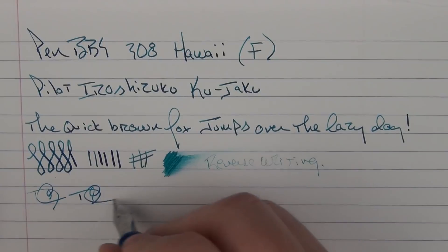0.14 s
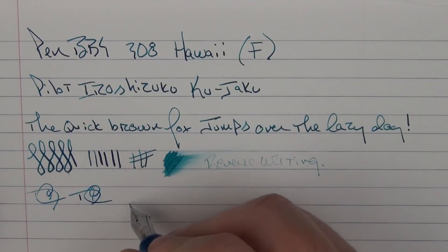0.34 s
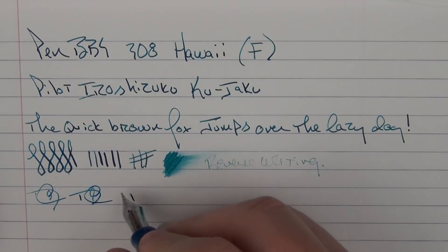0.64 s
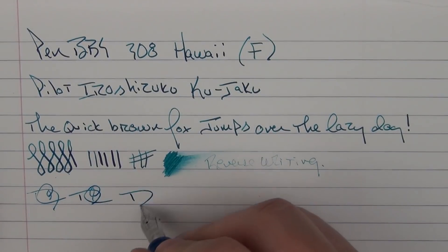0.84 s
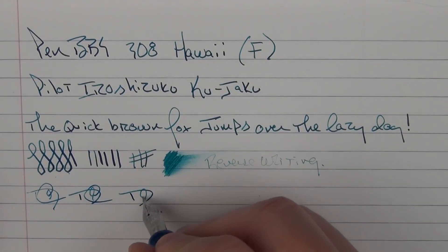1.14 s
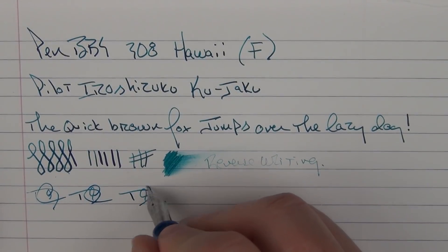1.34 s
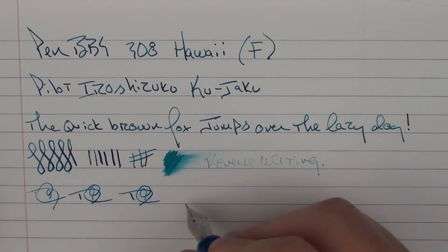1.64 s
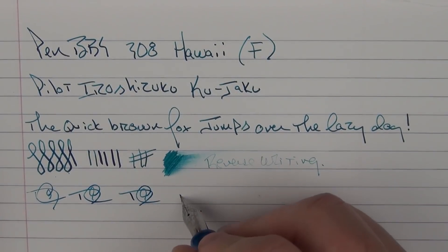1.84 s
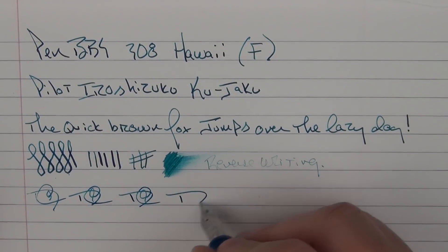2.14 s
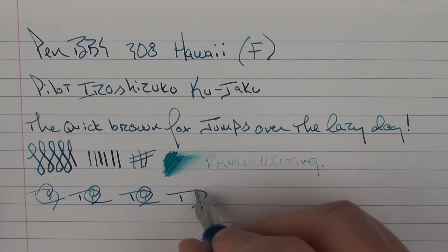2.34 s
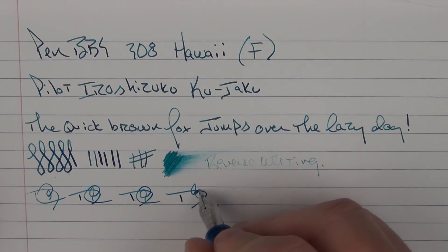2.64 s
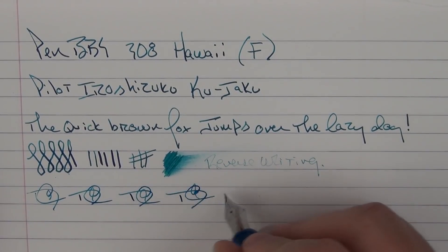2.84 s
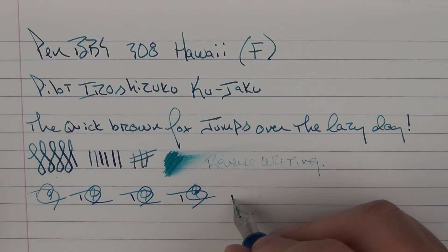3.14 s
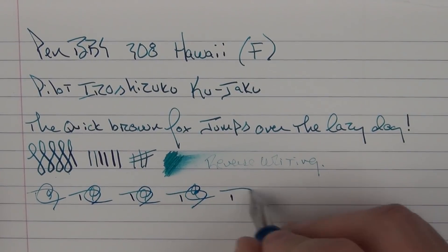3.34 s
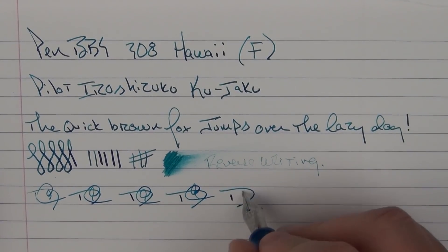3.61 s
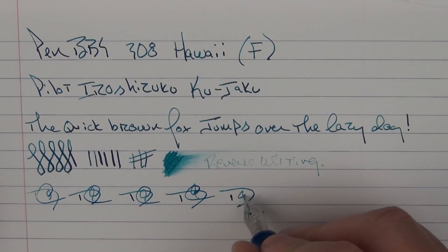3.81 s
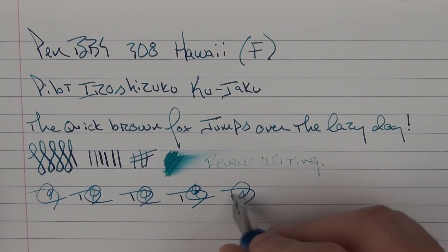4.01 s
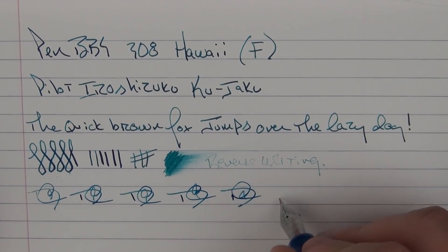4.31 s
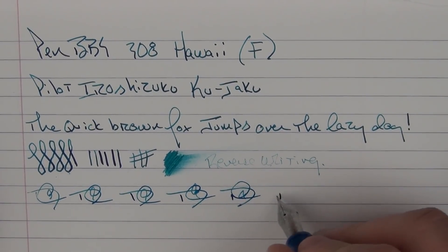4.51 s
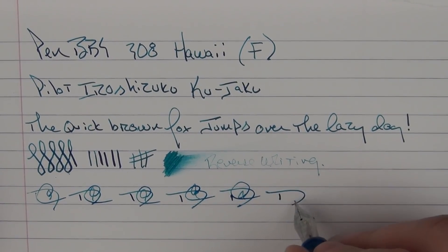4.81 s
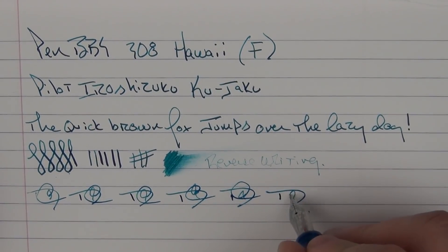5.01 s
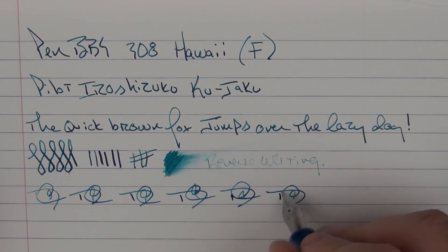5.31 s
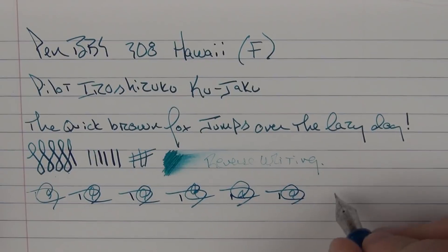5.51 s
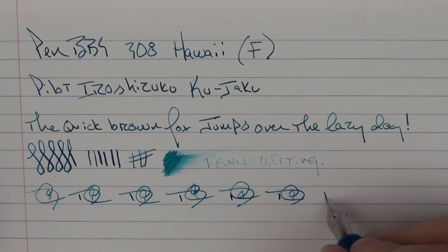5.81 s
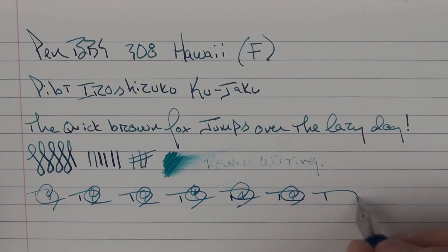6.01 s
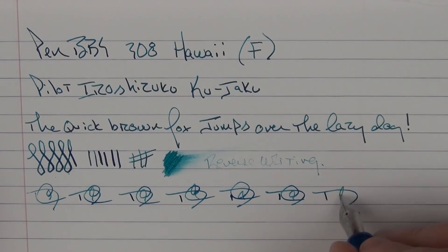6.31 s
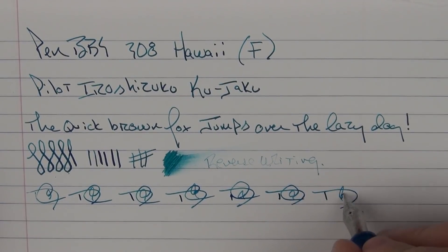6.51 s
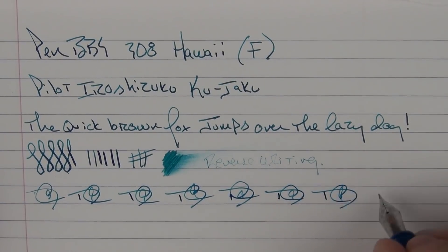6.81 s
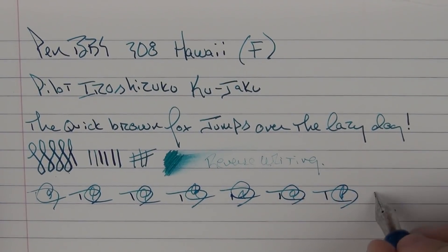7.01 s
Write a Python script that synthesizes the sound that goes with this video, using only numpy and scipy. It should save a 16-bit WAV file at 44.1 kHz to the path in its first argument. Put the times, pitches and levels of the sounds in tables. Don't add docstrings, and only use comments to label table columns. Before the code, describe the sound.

Close, scratchy pen strokes in rapid bursts, bright ticks and woody taps, brief skin hisses between, a late double knock, over low motor hum.

```python
import sys
import numpy as np
from scipy import signal
from scipy.fft import rfft, irfft
from scipy.io import wavfile
from scipy.ndimage import uniform_filter1d

SR = 44100
rng = np.random.default_rng(int(sys.argv[2]) if len(sys.argv) > 2 else 0)


def boost_factor(decibels):
    exponent = np.asarray(decibels, float) / 20
    return 10 ** exponent


def wav_record(signal):
    frames = np.transpose(np.atleast_2d(signal))
    bounded = np.clip(frames, -1, 1)
    quanta = np.round(bounded * 32767).astype(np.int16)
    wavfile.write(sys.argv[1], SR, quanta)


N = 315315

# f/Hz, width/Hz, level/dB
BARREL = [(598, 56, 2), (719, 11, -8), (740, 180, -13), (1007, 61, 4), (1022, 45, 1.5), (1176, 194, 2),
          (1341, 130, 3.5), (1495, 41, 7.5), (1688, 94, 1.5), (1986, 90, -1), (2486, 220, -7),
          (2874, 290, -14.5)]
# f/Hz, width/Hz, level/dB
TIP = [(3530, 440, -6), (4600, 250, -8.5), (5190, 107, -6.5), (5840, 350, -6), (6510, 350, -10),
       (6920, 136, -3), (7550, 290, -5), (8340, 310, -6), (9560, 370, -13), (10560, 350, -13.5),
       (11530, 170, -9), (12600, 260, -12), (14600, 700, -27)]


def curve(rows):
    return np.interp(np.arange(N) / SR, *np.transpose(rows))


def coloured(points):
    extra = 45
    hz = np.maximum(np.fft.rfftfreq(N + extra, 1 / SR), 1)
    at, db = np.transpose(points)
    shape = boost_factor(np.interp(np.log(hz), np.log(at), db))
    x = irfft(rfft(rng.standard_normal(N + extra)) * shape)[:N]
    return x / x.std()


def dull(x, hz):
    return signal.sosfilt(signal.butter(4, hz, fs=SR, output="sos"), x)


def body(x, modes, patchy_db=0.):
    gap = np.zeros(SR // 4)
    probe = np.concatenate([x + 1e-18, gap, [1.], gap])
    grip = uniform_filter1d(rng.standard_normal((len(modes), 400)), size=2) * np.sqrt(2)
    grip_at = np.linspace(0, len(x), 400)
    out = 0
    for k, (hz, width, db) in enumerate(modes):
        r = np.exp(-np.pi * abs(width) / SR)
        swell = np.interp(np.arange(len(probe)), grip_at, grip[k], right=0)
        poles = [1, -2 * r * np.cos(2 * np.pi * hz / SR), r * r]
        ring = signal.lfilter([1, 0, -1], poles, probe * boost_factor(patchy_db * swell))
        out = out + (-1) ** k * boost_factor(db) * (1 - r * r) * ring
    return out[:len(x)] / np.linalg.norm(out[-SR // 4:])


def struck(modes, contact_s):
    t = np.arange(SR // 3) / SR
    ring = sum(share * np.sin(2 * np.pi * hz * t) * boost_factor(-60 * t / t60) for hz, share, t60 in modes)
    force = np.hanning(max(int(contact_s * SR), 3))
    return np.convolve(ring, force / force.sum())[:len(t)]


def pulses(rows, shape):
    s, db = np.transpose(rows)
    train = np.zeros(N)
    np.add.at(train, (s * SR).astype(int), boost_factor(db))
    return signal.fftconvolve(train, shape)[:N]


def fibres(per_s, spread_db):
    size = boost_factor(spread_db * np.minimum(rng.exponential(1, N), 5)) * rng.choice([-1, 1], N)
    x = size * (rng.random(N) < per_s / SR)
    return x / x.std()


def hum():
    # f/Hz, level/dB
    orders = [(29.9, -28), (59.8, -34), (89.8, -17), (120, -5.5)]
    wander = np.cumsum(coloured([(1, 31), (3, -23), (30, -59)])) / SR
    turn = 2 * np.pi * (np.arange(N) / SR + 0.0018 * wander)
    return sum(np.sqrt(2) * boost_factor(db) * np.sin(hz * turn + k) for k, (hz, db) in enumerate(orders))


def room_air():
    # f/Hz, level/dB per Hz
    air = [(35, -0.5), (52, -5), (75, -13), (100, -3.5), (170, -11.5), (345, -16), (510, -23.5),
           (1150, -29), (4370, -35), (7230, -36), (16000, -37.5)]
    return coloured(air)


def capsule_hiss():
    # f/Hz, level/dB per Hz
    capsule = [(40, -1.5), (150, -5.5), (345, -3.5), (1470, -9.5), (6000, -9), (16000, -9.5)]
    return coloured(capsule)


def desk_rumble(gain):
    # t/s, level/dB
    leans = [(.9, -34), (1.59, -23), (1.9, -25), (2.07, -20.5), (2.38, -28), (3.15, -29), (3.37, -21),
             (3.68, -26), (4.02, -27), (4.19, -22), (4.49, -27), (4.68, -23), (5.0, -22), (5.42, -21),
             (5.59, -20.5), (5.81, -21), (6.05, -20), (6.2, -27), (6.77, -29), (6.92, -22)]
    lean_s, steady_db = 0.11, -23.5
    s, db = np.transpose(leans)
    t = np.arange(0, N, 50) / SR
    power = (boost_factor(db - 10 * ((t[:, None] - s) / lean_s) ** 2) ** 2).sum(axis=1)
    level = np.sqrt(np.interp(np.arange(N) / SR, t, power) + (gain * boost_factor(steady_db)) ** 2)
    return level * coloured([(5, -24), (15, 23), (22, 0), (40, 16.0), (55, -1), (90, -34.5)])


def nib(tail=1.71):
    # t of top speed/s, barrel level/dB, length/s, tip level over barrel/dB
    pulls = [(0.037, -41.5, .04, -27), (.132, -31, 0.047, -13.5), (.19, -26.5, 0.033, -10.5),
             (.902, -28.5, 0.053, -14.5), (1.378, -29.5, 0.018, -17), (2.236, -25, 0.048, -12),
             (2.428, -38, 0.065, -5.5), (2.725, -30, .029, -17), (2.931, -38.5, 0.055, -1.5),
             (3.503, -28.5, 0.041, -11.5), (3.691, -40.5, .041, -8), (3.761, -37, 0.031, -10),
             (4.19, -35.5, 0.053, -7), (4.526, -33.5, .031, -10.5), (5.302, -33.5, 0.033, -14),
             (6.069, -33.5, 0.051, -1.5), (6.14, -25.5, 0.027, -17)]
    flicks = [(1.076, -42.5, 0.045, -8), (1.172, -41.5, 0.044, -7.5), (1.232, -42, 0.036, -10.5),
              (5.531, -31, .018, -16), (1.532, -25, 0.047, -10), (1.848, -46, 0.034, -1),
              (1.93, -37, 0.035, -8), (2.129, -15, 0.042, -11), (2.359, -38, 0.024, -5),
              (2.493, -35, .037, -7), (3.116, -43.5, 0.046, -2), (3.386, -21.5, 0.021, -9.5),
              (3.63, -39.5, 0.029, -8), (3.98, -33, 0.037, -13), (4.071, -28.5, 0.088, -9.5),
              (4.126, -18, 0.032, -14.5), (4.713, -17.5, 0.031, -12), (5.531, -38, 0.14, -11),
              (5.822, -42, 0.05, -4.5), (6.02, -17.5, 0.027, -27), (6.034, -19, 0.044, -12.5),
              (6.387, -34, .04, -9), (6.855, -33, 0.015, -13), (7.14, -36.5, 0.066, -10),
              (2.862, -19.5, 0.031, -12), (5.444, -21, 0.026, -12), (6.758, -23, 0.024, -13)]
    sweeps = [(.597, -41.5, 0.062, -7), (.819, -24, 0.051, -7.5), (1.475, -30.5, 0.1, -9.5),
              (2.554, -36, 0.024, -15), (2.79, -39, .03, -12), (2.824, -31, 0.085, -10),
              (3.209, -41, 0.093, -7.5), (3.411, -17, .035, -11.5), (3.472, -25.5, 0.042, -13.5),
              (3.818, -40.5, 0.039, -11), (4.432, -48, 0.028, -1), (4.657, -37, 0.016, -12),
              (4.749, -19, 0.034, -14), (4.813, -29.5, .06, -12), (5.008, -39, 0.022, -17),
              (5.088, -40, 0.045, -12), (5.394, -30.5, 0.086, -10.5), (6.115, -25, 0.028, -12.5),
              (6.313, -39, 0.065, -8.5), (6.605, -29, 0.025, -13), (6.685, -33, .033, -21),
              (6.716, -29, 0.098, -12.5), (7.045, -45, 0.015, -4)]
    # t/s, barrel level/dB
    light = [(.076, -51.5), (.155, -50), (.655, -56), (1.13, -52), (1.205, -54), (1.416, -48), (2.182, -42),
             (2.529, -49), (2.763, -47.5), (4.023, -49), (5.348, -45), (6.49, -59), (6.655, -52)]
    # f/Hz, width/Hz, level/dB
    slit_modes = [(3240, 130, 0), (3520, 160, -2)]
    # f/Hz, width/Hz, level/dB
    desk_modes = [(41.8, 7.3, -7), (106.2, 5, 9), (158.3, 6.1, 8), (184, 10.5, 3), (217, 23, -12.5),
                  (265.3, 12.5, -1.5), (343.3, 28.2, -0.5), (460, 60, -8.5), (677, 61, -12.5)]

    crossings = [(s, db, 0.033, 6) for s, db in light]
    kinds = (pulls, 0.62), (flicks, 0.37), (list(sweeps) + crossings, 0.51)
    t, power = np.arange(N) / SR, np.zeros((3, N))
    for rows, share in kinds:
        for s, db, length, tip_db in rows:
            rise, fall = share * length, (1 - share) * length
            desk_db = 11 + 0.52 * tip_db - 0.2 * (db + 31)
            near = slice(max(int((s - .15) * SR), 0), int((s + .2) * SR))
            late = t[near] - s
            off = np.abs(late) / np.maximum(np.where(late < 0, rise, fall), .004)
            parts_db = db + np.array([[0], [tip_db], [desk_db]])
            power[:, near] += boost_factor(parts_db - 6.68 * off ** tail) ** 2
    barrel, tip, desk = np.sqrt(power)

    catches = fibres(per_s=5000, spread_db=2.5)
    fine = fibres(per_s=6000, spread_db=3.0)
    slit_ring = body(np.sqrt(barrel * tip) * catches, slit_modes, patchy_db=2)
    paper = tip * np.diff(fine, n=2, prepend=[0, 0])
    desk_ring = body(desk * catches, desk_modes, patchy_db=2.0)
    upper_desk = dull(signal.lfilter([1, -.985], [1], desk_ring), hz=1330)
    barrel_ring = dull(body(barrel * catches, BARREL, patchy_db=3.0), hz=3330)
    tip_ring = body(tip * (0.82 * catches + 1.78 * fine), TIP, patchy_db=3.0)
    return (boost_factor(4.5) * barrel_ring + boost_factor(2.5) * tip_ring + boost_factor(28.5) * upper_desk
            + boost_factor(-5.0) * slit_ring + boost_factor(-9.0) * paper)


def touches():
    # t/s, peak level/dB
    landings = [(0.184, -18), (0.5032, -18), (0.7595, -15), (1.0246, -23), (1.8444, -14), (2.0761, -10.0),
                (2.3544, -14), (2.424, -14.5), (3.1125, -17), (3.3439, -10.5), (3.6256, -15), (4.177, -15),
                (4.4264, -15.5), (4.5191, -25), (4.6536, -11), (4.9416, -13.5), (5.7515, -12),
                (5.9085, -16), (5.9778, -8), (6.1104, -13.5), (6.2534, -12.5), (6.3287, -18.0),
                (7.0393, -16)]
    # t/s, peak level/dB
    contacts = [(0.4949, -23), (0.6947, -18), (0.7561, -17), (0.9606, -20.5), (0.9844, -27), (1.0221, -34),
                (1.8415, -20), (1.9946, -23), (2.0008, -16), (2.0738, -17.5), (2.2741, -19),
                (2.2768, -16.5), (2.2794, -19), (2.2877, -19.5), (2.3535, -33), (2.9515, -18),
                (3.1099, -26), (3.2591, -15.5), (3.3429, -17), (3.5279, -21), (3.6257, -25), (4.4247, -25),
                (4.6529, -21), (4.9418, -21), (5.7516, -19.5), (5.979, -17), (6.2537, -18.5),
                (6.8505, -7.5), (7.0382, -23)]
    # f/Hz, signed share, t60/s
    pad_modes = [(160, .19, .3), (174, .41, .17), (263, .07, .3), (336, -.8, .031), (452, .46, .013),
                 (668, .06, .09)]
    # f/Hz, signed share, t60/s
    snap_modes = [(710, 0.23, 0.0047), (1200, 0.13, 0.019), (2100, .1, 0.015), (2600, 0.099, 0.015)]
    fizz = pulses(contacts, np.exp(-np.arange(400) / 17.0)) * rng.standard_normal(N)
    fizz = dull(np.diff(fizz, prepend=0), hz=8150)
    tick = fizz + boost_factor(-2.5) * body(fizz, TIP) + boost_factor(4.5) * body(fizz, BARREL[4:])
    thud = pulses(np.subtract(landings, [.0008, 0]), struck(pad_modes, contact_s=.0007))
    snap = pulses(np.add(landings, [.001, 0]), struck(snap_modes, contact_s=0.000099))
    return tick + boost_factor(0.5) * thud + snap


def hand():
    # t of full speed/s, hold/s, level/dB
    slides = [
        (0.272, 0.05, -32.5),
        (1.631, 0.037, -30),
        (2.962, 0.035, -30.5),
        (4.212, 0.057, -31.5),
        (5.565, 0.036, -31.5),
        (6.881, 0.033, -31.5),
    ]
    # f/Hz, level/dB per Hz
    skin = [(290, -37), (500, -7), (829, -5.5), (958, -2), (2120, -1.5), (5120, -1), (12500, -14.5),
            (15800, -15)]
    attack_s, release_s, sag_db_per_s = 0.15, 0.074, 15
    t = np.arange(N) / SR
    levels = []
    for s, hold, db in slides:
        sag = sag_db_per_s * np.clip(t - s, 0, hold)
        before = 20 * (np.minimum(t - s, 0) / attack_s) ** 2
        after = 20 * (np.maximum(t - s - hold, 0) / release_s) ** 2
        levels.append(db - sag - before - after)
    level = np.max(levels, axis=0)
    grain_db = 2.0 * coloured([(20, 3), (60, -21), (300, -11), (1000, 1)])
    level = uniform_filter1d(level, size=600)
    hiss = coloured(skin)
    low = dull(hiss, hz=8500)
    sheen = boost_factor(0.94 * (level + 36.5)) * (dull(hiss, hz=16500) - low)
    return boost_factor(level + 4.5 + grain_db) * (low + sheen)


def knocks():
    # t/s, level/dB
    bumps = [
        (6.8011, 2),
        (6.8048, 6.5),
        (6.8767, 1),
        (6.8803, 5.5),
        (6.891, -10),
    ]
    # t/s, level/dB
    nudges = [
        (5.917, -8),
        (6.101, -6),
        (6.8438, -2),
        (6.8538, -2.5),
        (6.919, -7),
        (6.942, -15),
    ]
    # f/Hz, signed share, t60/s
    edge = [(42, -0.13, 0.3), (65, -0.18, 0.15), (105, 0.18, 0.3), (173, 0.49, 0.101), (266, 0.19, 0.107),
            (340, 0.2, 0.118), (468, 0.09, 0.08), (595, -0.75, 0.009), (969, 0.09, 0.03)]
    # f/Hz, signed share, t60/s
    crack = [(686, 0.051, 0.048), (804, 0.065, 0.04), (997, 0.11, 0.075), (1190, 0.032, 0.072)]
    blow = -struck(edge, contact_s=.001) - struck(crack, contact_s=0.00089)
    soft_blow = -struck(edge, contact_s=0.0037)
    fade = boost_factor(-60 * np.arange(SR // 5) / SR / 0.14)
    shaking = pulses(list(bumps) + list(nudges), fade)
    rattle = dull(shaking * rng.standard_normal(N), hz=1140)
    return boost_factor(-14.5) * rattle + pulses(bumps, blow) + pulses(nudges, soft_blow)


def scene():
    # t/s, level/dB
    gain_rows = [
        (0.0, -24),
        (0.76, -21.5),
        (2.79, -18),
        (5.5, -18.5),
        (6.19, -17.5),
        (7.15, -18),
    ]
    gain = boost_factor(curve(gain_rows))
    pen = nib() + boost_factor(4.5) * touches() + knocks()
    background = desk_rumble(gain) + gain * (hum() + boost_factor(-7.0) * room_air())
    mid = pen + hand() + background
    side = gain * boost_factor(-20.5) * capsule_hiss()
    return np.array([mid + side, mid - side])


def band_limit(x):
    return signal.sosfilt(signal.butter(12, 16400, fs=SR, output="sos"), x)


def record(dry):
    cut = signal.ellip(12, .5, 70, 15640, fs=SR, output="sos")
    level = 1.3 * np.tanh(.5 * dry)
    return band_limit(signal.sosfilt(cut, level))


dry = scene()
out = record(dry)
wav_record(out)
```